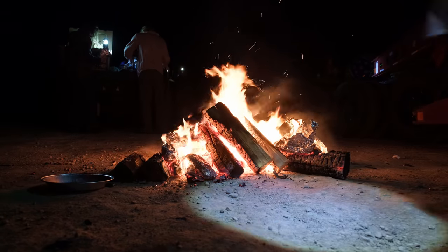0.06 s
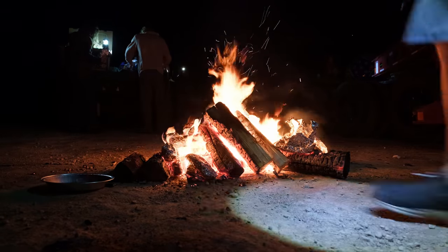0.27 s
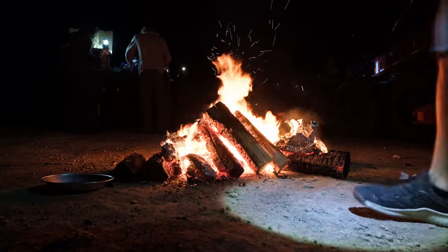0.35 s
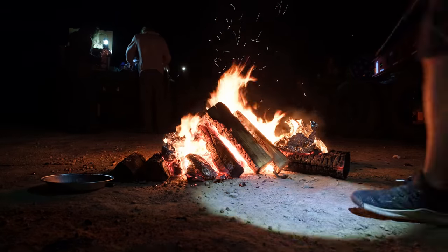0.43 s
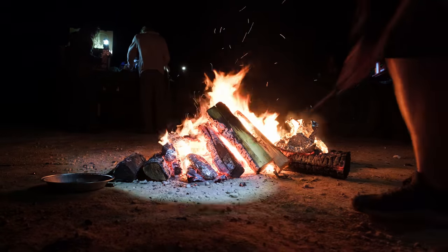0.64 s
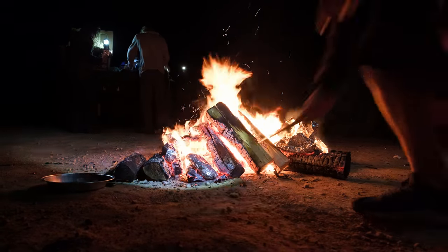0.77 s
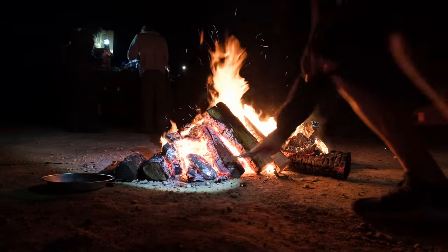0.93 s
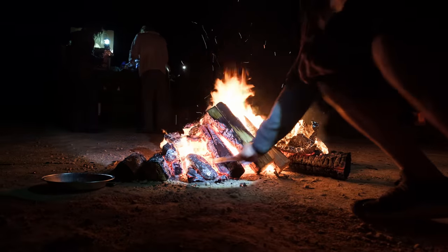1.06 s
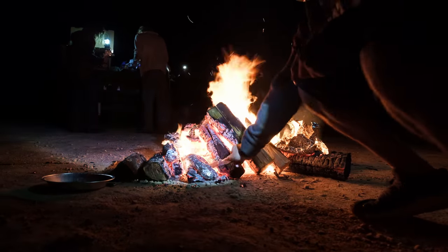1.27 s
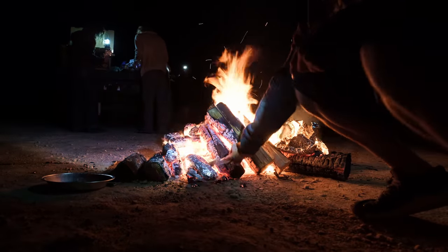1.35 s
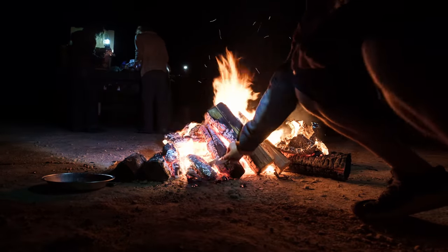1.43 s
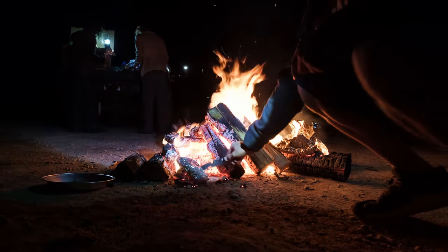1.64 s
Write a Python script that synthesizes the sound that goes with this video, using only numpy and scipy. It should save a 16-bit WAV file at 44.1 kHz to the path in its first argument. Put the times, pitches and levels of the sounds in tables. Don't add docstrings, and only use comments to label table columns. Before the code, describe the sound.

A wood campfire burns close to the microphone outdoors, with soft low rumble, fluttering steam hiss, fine ticks and bright spits. Soft gravel footfalls thump around 0.15-0.3 s. A violent, clipped log pop hits at 0.48 s, ducking the level briefly. Dull knocks cluster at 0.65-0.8 s, raking and a hard snap at 1.12 s, another huge pop at 1.41 s, then hiss recovers with small scrapes and a snap near 1.62 s.

```python
import sys
import numpy as np
from scipy import signal
from scipy.io import wavfile

SR = 44100
rng = np.random.default_rng(int(sys.argv[2]) if len(sys.argv) > 2 else 0)


def generate_wav(sig):
    pcm = np.round(np.clip(np.atleast_2d(sig).T, -1, 1) * 32767).astype(np.int16)
    wavfile.write(sys.argv[1], SR, pcm)


def invert_db(level):
    return 10 ** (np.asarray(level, dtype=float) / 20)


N = 74970


def rms_one(x):
    return x / np.sqrt(np.mean(x ** 2) + 1e-20)


def drift(rate_hz):
    r = np.exp(-80 * np.pi * rate_hz / SR)
    white = rng.standard_normal(N // 40 + 2002)
    slow = signal.lfilter([1], [1, -2 * r, r * r], white)[2000:]
    return np.interp(np.arange(N) / 40, np.arange(len(slow)), rms_one(slow))


def ring(x, hz, width_hz):
    r = np.exp(-np.pi * max(width_hz, 10) / SR)
    w = 2 * np.pi * min(hz, .45 * SR) / SR
    return signal.lfilter([0, np.sin(w)], [1, -2 * r * np.cos(w), r * r], x + 1e-18)


def band(x, hz, width_hz):
    high = np.sqrt(hz ** 2 + width_hz ** 2 / 4) + width_hz / 2
    low = hz ** 2 / high
    sos = signal.butter(2, [low, min(high, .45 * SR)], "band", fs=SR, output="sos")
    return signal.sosfilt(sos, x + 1e-18)


def add(out, s, piece):
    i = int(s * SR)
    out[i:i + len(piece)] += piece[:N - i]


def grains(count, per_s, spread_db):
    sizes = invert_db(spread_db * np.minimum(rng.exponential(1, count), 4))
    signs = rng.choice([-1, 1], count)
    return sizes * signs * (rng.random(count) < per_s / SR)


def flicker_noise(spectrum, shared_db, own_db, rate_hz):
    hz, level_db = np.transpose(spectrum)
    edges = hz[0] * 2 ** np.arange(0, np.log2(hz[-1] / hz[0]) + .3, 1 / 3)
    together = drift(rate_hz)
    white = rng.standard_normal((2, N + 4000))
    out = 0
    for k, (low, high) in enumerate(zip(edges, edges[1:])):
        sos = signal.butter(2, [low, high], "band", fs=SR, output="sos")
        noise = signal.sosfilt(sos, white[k % 2])[-N:]
        gain_db = np.interp(np.log(low * high) / 2, np.log(hz), level_db)
        gain_db = gain_db + shared_db * together + own_db * drift(rate_hz / 2)
        out = out + invert_db(gain_db) * noise
    return rms_one(out)


# f/Hz, level/dB per Hz
FLAME_TONE = [(20, -14), (45, -4), (90, -3), (160, -2.5), (300, -6.5), (450, -13), (700, -19)]


def flame_rumble():
    return invert_db(-41.5) * flicker_noise(FLAME_TONE, shared_db=1.5, own_db=-0.2, rate_hz=6.3)


# f/Hz, level/dB per Hz
STEAM_TONE = [(500, 6), (800, -2), (1500, 0.5), (2600, -1), (4700, -2.5), (7500, -7), (10000, -16),
              (16000, -12.5)]


def steam_hiss():
    return invert_db(-39.5 - 7.0) * flicker_noise(STEAM_TONE, shared_db=2.25, own_db=0.74, rate_hz=42.0)


def ember_ticks():
    clicks = grains(N, 1200 * invert_db(3.0 * drift(8.0)), 2.8)
    pitches = np.geomspace(900, 9500, 14)
    dealt = rng.integers(0, 14, N)
    out = np.zeros(N)
    for k, hz in enumerate(pitches):
        weight = invert_db(-5.5 * np.log2(hz))
        out += weight * band(clicks * (dealt == k), hz, hz / 3.0)
    return invert_db(-45) * rms_one(out)


# t/s, hiss level/dB, rumble level/dB
VIGOUR = [
    (0, 1.5, 0),
    (.25, 3, 6),
    (.47, 2, 3.5),
    (.7, 1, 4.5),
    (.9, 3.5, 1.5),
    (1.1, 3.5, 5.5),
    (1.3, 1.5, 1),
    (1.501, 8.5, 2.5),
    (1.7, 0.5, 0.5),
]


def fire():
    t = np.arange(N) / SR
    s, hiss_db, rumble_db = np.transpose(VIGOUR)
    hiss = (steam_hiss() + ember_ticks()) * invert_db(np.interp(t, s, hiss_db))
    rumble = flame_rumble() * invert_db(np.interp(t, s, rumble_db))
    return hiss + rumble


# t/s, peak level/dB, f/Hz, width/Hz
SPITS = [(0.0136, -28, 4860, 4970), (0.0621, -23, 4250, 3020), (0.3164, -26.5, 5900, 3020),
         (0.378, -28.5, 7100, 2500), (0.4088, -25, 6200, 3000), (0.456, -35, 6900, 2500),
         (.619, -30, 7200, 2500), (0.651, -32.5, 6840, 4000), (.666, -27.5, 5500, 3500),
         (.7172, -31, 4030, 1500), (.84, -28.5, 3150, 1500), (.887, -25.5, 12100, 6000),
         (.887, -26, 6050, 3030), (0.9606, -32, 3330, 1000), (1.0232, -32, 8400, 8000),
         (1.1227, -34.5, 13300, 5100), (1.146, -31, 7200, 3000), (1.278, -36, 6000, 6050),
         (1.3972, -27, 11000, 9000), (1.405, -23.5, 7140, 2500), (1.507, -23, 8500, 8000),
         (1.5454, -26, 8000, 8000), (1.5683, -27.5, 3700, 3020), (1.585, -40, 5500, 2500)]


def sap_spits():
    out, t = np.zeros(N), np.arange(600) / SR
    t60_s = 0.013
    for s, db, hz, width_hz in SPITS:
        white = rng.standard_normal(len(t))
        piece = band(white * invert_db(-60 * t / t60_s), hz, width_hz)
        add(out, s, invert_db(db) * piece / np.abs(piece).max())
    return out


# t/s, length/s, level/dB, f/Hz, width/Hz
SHUFFLES = [(.15, 0.017, -34.5, 119, 60.5), (0.185, 0.022, -23, 137, 40.6), (.228, 0.039, -27.5, 144, 61.5),
            (.275, 0.032, -36.5, 192, 120), (.647, 0.0086, -28, 214, 200), (0.653, 0.017, -27, 444, 149),
            (0.669, 0.044, -32.5, 325, 300), (0.699, 0.024, -29, 790, 199), (0.716, 0.11, -40.5, 900, 900),
            (0.899, 0.04, -46.5, 7050, 3000), (1.065, 0.048, -38, 1400, 600),
            (1.123, 0.039, -32.5, 1430, 750), (1.118, 0.032, -36, 3080, 1480),
            (1.162, 0.046, -41, 2500, 2500), (1.366, 0.014, -39.5, 1730, 1730),
            (1.529, 0.049, -37, 3240, 1500), (1.538, 0.017, -45, 10600, 7000),
            (1.575, 0.031, -34.5, 200, 156), (1.606, 0.009, -35, 3700, 2500),
            (1.614, 0.013, -30.5, 3060, 1900), (1.602, 0.037, -46.5, 9100, 8000)]


def gravel_shuffles():
    out = np.zeros(N)
    contacts_per_s, spread_db = 1400, 4.5
    grit = 0.26
    for s, length_s, db, hz, width_hz in SHUFFLES:
        t = np.arange(SR // 8) / SR / length_s
        swell = np.clip(np.minimum(t / 0.28, (1.15 - t) / 0.49), 0, 1)
        touch = grains(len(t), contacts_per_s, spread_db) * swell
        piece = band(touch, hz, width_hz)
        if hz > 400:
            piece = piece + grit * band(touch, hz, 4 * width_hz)
        level = np.sqrt(np.sum(piece ** 2) / (length_s * SR))
        add(out, s, invert_db(db) * piece / level)
    return out


# t/s, peak level/dB, f/Hz, ring/cycles, polarity/sign
SNAPS = [(0.141, -31, 1410, 1.4, 1), (.245, -21.5, 1600, 1.5, 1), (.652, -13.5, 1100, 1.1, -1),
         (0.7129, -15.5, 1100, 1.1, -1), (.7178, -10.5, 850, 1.3, -1), (0.732, -23, 1000, 1.5, -1),
         (0.7689, -17.5, 900, 1.4, -1), (0.8148, -23, 970, 2.2, 1), (1.015, -19.5, 1560, 1.9, 1),
         (1.1238, -7, 1510, 0.87, 1), (1.17, -22, 900, 1.7, 1), (1.249, -26, 2000, 1.6, 1),
         (1.3681, -18.5, 1900, 2, -1), (1.3741, -13, 1700, 2.2, 1), (1.396, -24, 1300, 1.5, 1),
         (1.622, -15.5, 2980, 3.5, -1)]


def dull_snaps():
    out, click = np.zeros(N), np.eye(1, 600)[0]
    edge_share, edge_hz = 0.65, 3150
    edge = band(click, edge_hz / 3, edge_hz)
    for s, db, hz, cycles, polarity in SNAPS:
        body = ring(click, hz, 1.53 * hz / max(cycles, .5))
        piece = body / body.max() + edge_share * edge / edge.max()
        piece = band(piece, 1120, 4400)
        add(out, s, invert_db(db) * np.sign(polarity) * piece / piece.max())
    return out


POP_TIMES = [.48428, 1.41308]
# level/dB, ground echo delay/s, echo share/ratio
POPS = [
    (12, 0.001793, 0.45),
    (13, .0013, 0.11),
]
# f/Hz, width/Hz, level/dB
LOG_MODES = [
    [(518, 87, 0), (900, 350, 2.5), (245, 140, -9), (1500, 345, 5.5), (3000, 127, 7.5), (4000, 117, -1.5),
     (5220, 610, -12.5), (7870, 820, -5), (10400, 1400, -20)],
    [(575, 203, 2.5), (1100, 510, 3.5), (1586, 280, -1.5), (2500, 310, 4.5), (4096, 620, 0),
     (5750, 810, -4), (8910, 370, -6), (12000, 3900, -34)],
]


def log_pops():
    out, t = np.zeros(N), np.arange(SR // 8) / SR
    echo_cut = signal.butter(2, 6200, fs=SR)
    tail_cut = signal.butter(3, 2600, fs=SR)
    tail_db, tail_t60_s = -33, .2
    for s, (db, delay_s, share), modes in zip(POP_TIMES, POPS, LOG_MODES):
        body = np.zeros(len(t))
        for hz, width_hz, level_db in modes:
            body += invert_db(level_db) * width_hz * ring(t == 0, hz, width_hz)
        echo = share * signal.lfilter(*echo_cut, body)
        add(body, delay_s, echo[:-int(delay_s * SR)])
        tail = rms_one(signal.lfilter(*tail_cut, rng.standard_normal(len(t))))
        tail = invert_db(tail_db - 60 * t / tail_t60_s) * tail * np.minimum(t / 0.002, 1)
        add(out, s, invert_db(db) * (body / np.abs(body).max() + tail))
    return out


def scene():
    return (fire() + sap_spits() + gravel_shuffles() + dull_snaps() + log_pops())[None]


# depth/dB, hold/s, release/s
DUCKS = [
    (19, 0.08, 0.085),
    (20, 0.07, 0.059),
]


def gain_duck():
    t, duck_db = np.arange(N) / SR, 0
    delay_s, attack_s, knee_s, knee_share = .0025, .005, 0.013, 0.74
    for s, (depth_db, hold_s, release_s) in zip(POP_TIMES, DUCKS):
        corners = s + np.cumsum([delay_s, attack_s, hold_s, knee_s, release_s])
        depths = [0, depth_db, depth_db, knee_share * depth_db, 0]
        duck_db = duck_db - np.interp(t, corners, depths)
    return invert_db(duck_db)


def band_limit(x):
    return signal.sosfilt(signal.butter(12, 16170, fs=SR, output="sos"), x)


def record(dry):
    port = 0.41 * band(dry, 3675, 1330)
    x = np.clip((dry + port) * gain_duck(), -1, 1)
    x = signal.sosfilt(signal.cheby2(10, 40, 16400, fs=SR, output="sos"), x)
    return band_limit(x)


dry = scene()
out = record(dry)
generate_wav(out)
```